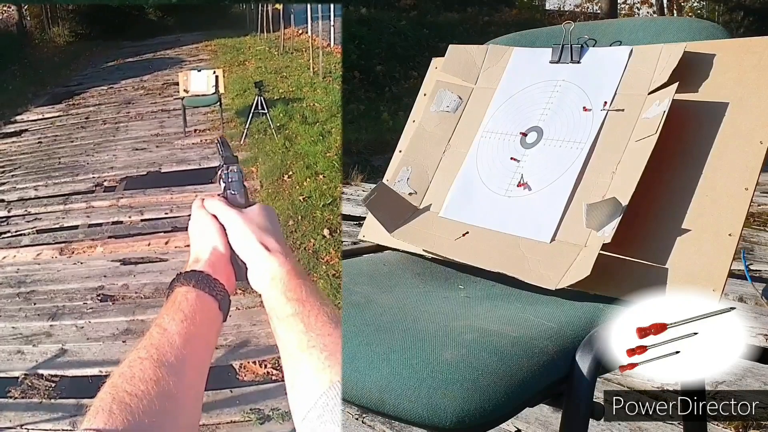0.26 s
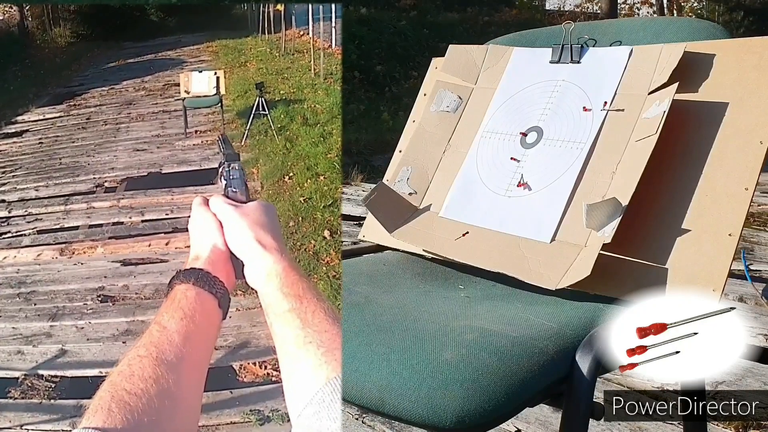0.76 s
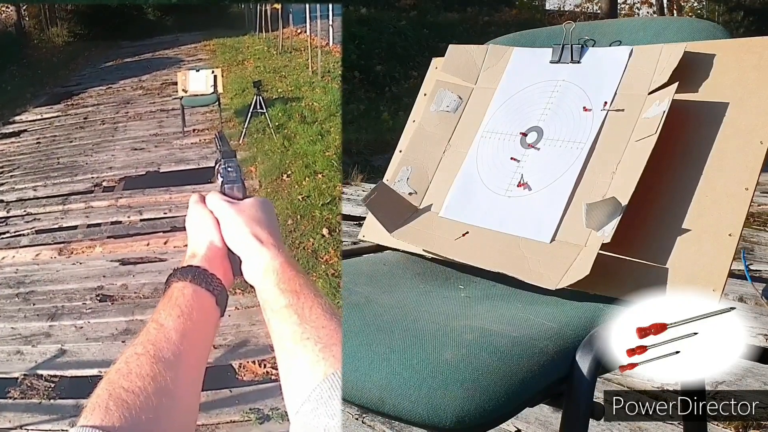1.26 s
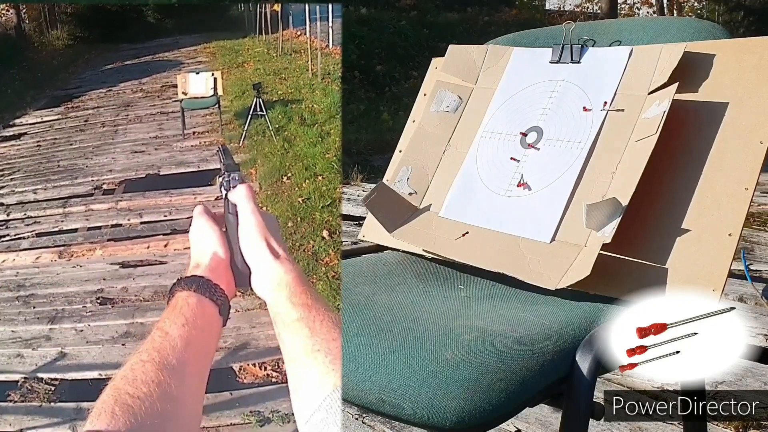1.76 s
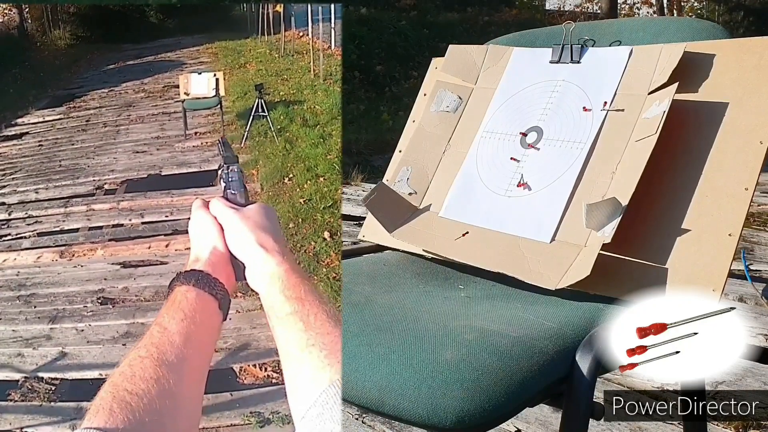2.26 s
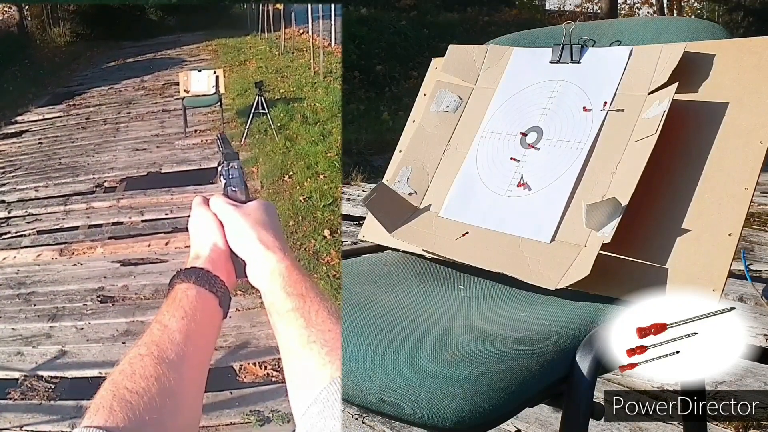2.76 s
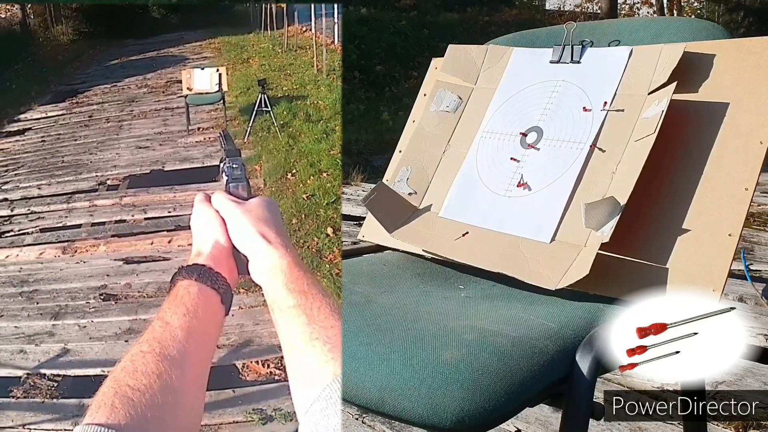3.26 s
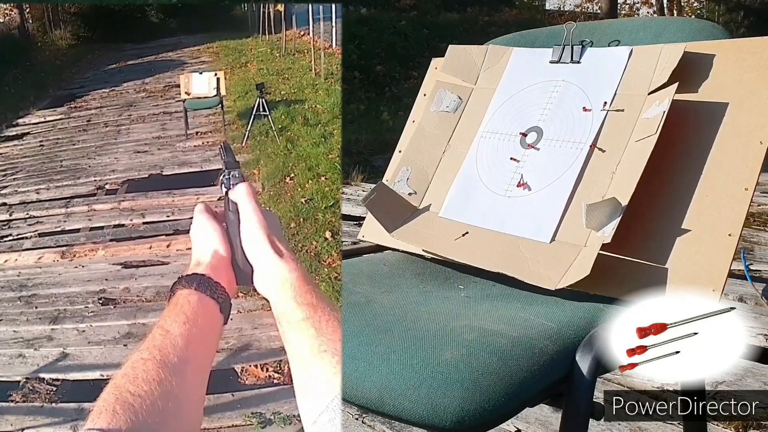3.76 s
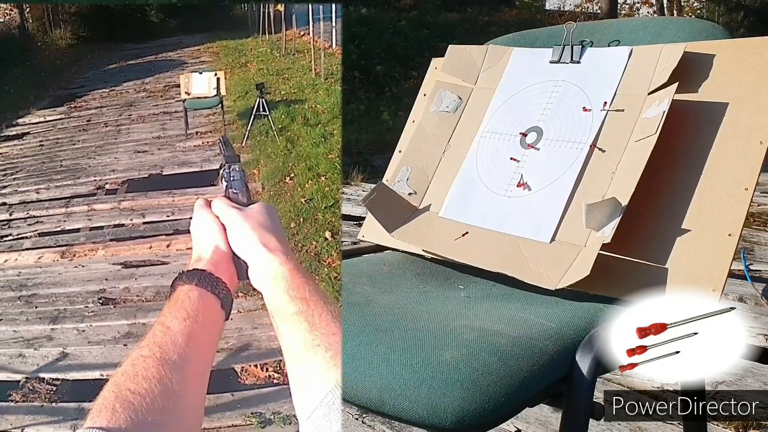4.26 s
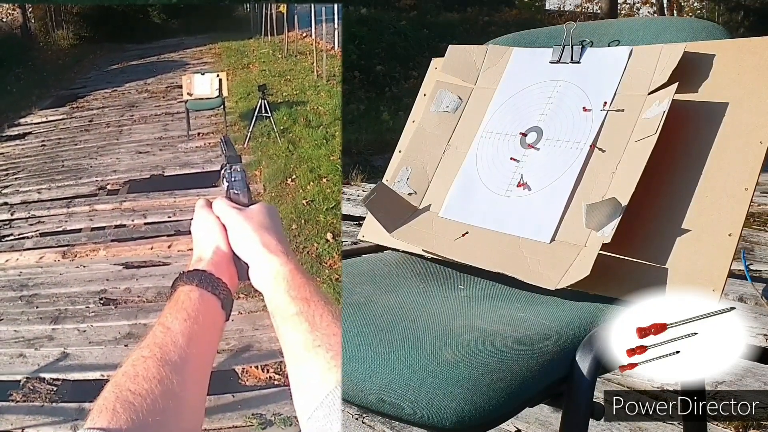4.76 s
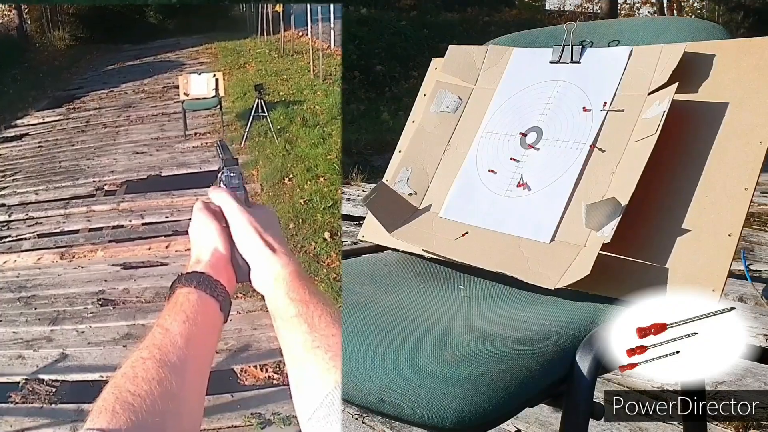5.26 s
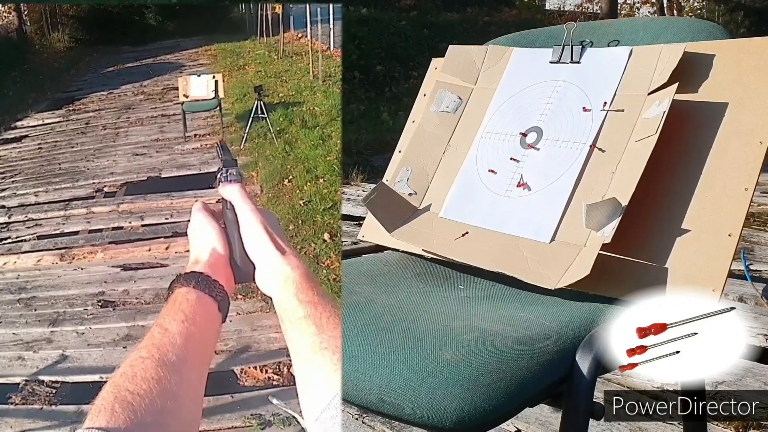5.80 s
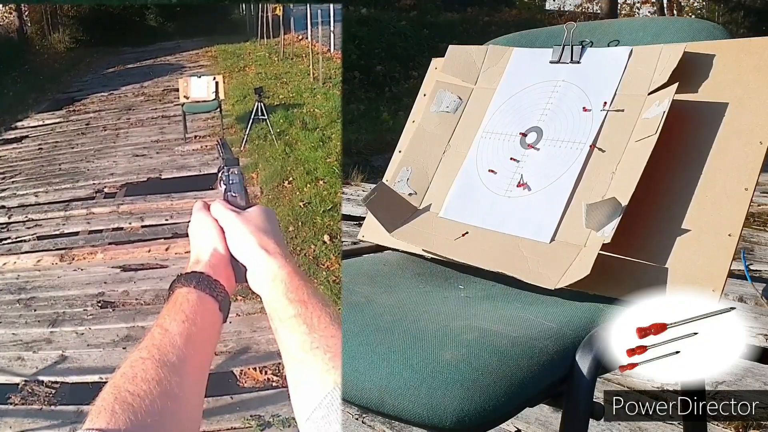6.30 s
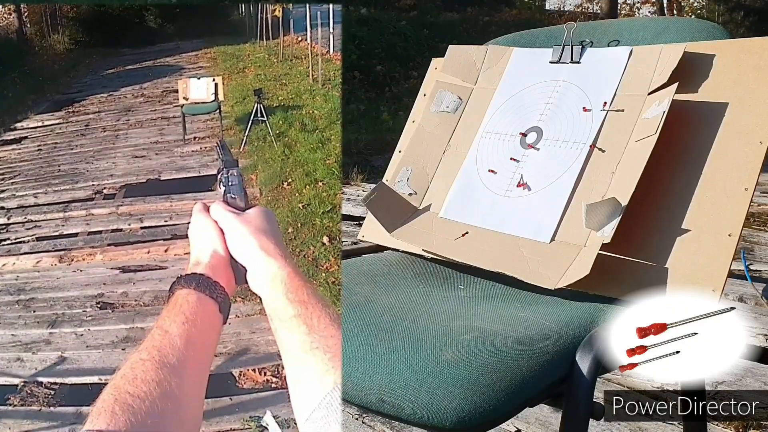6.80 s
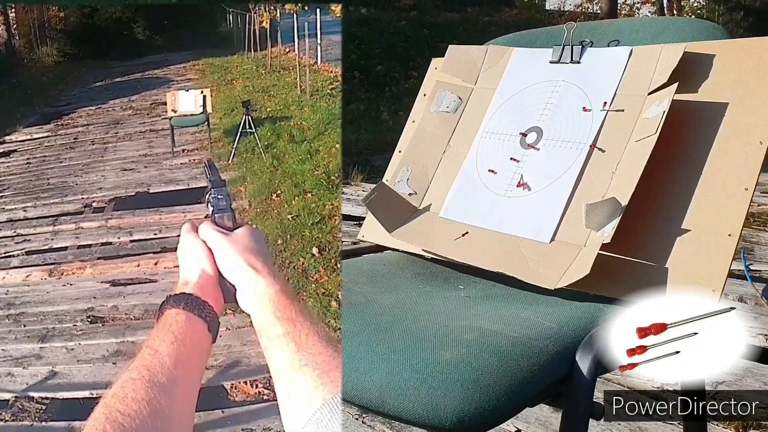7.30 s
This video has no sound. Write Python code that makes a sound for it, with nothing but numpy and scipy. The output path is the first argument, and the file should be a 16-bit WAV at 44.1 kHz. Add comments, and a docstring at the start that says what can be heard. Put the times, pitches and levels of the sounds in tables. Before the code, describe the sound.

A quiet garden murmur with light low wind. At 0.06 s a faint cylinder scrape and soft metal latch click; around 0.7 s barely audible bird chirps. At 1.22 s an air revolver fires: hammer snap, dry muzzle crack and short gas pop, overloading slightly, then a dart bursts sharply into cardboard at 1.31 s. Bright, uneven echoes fade within about half a second. Cocking clicks at 1.8 s, a shot at 3.22 s with card snap at 3.30 s, another tiny chirp and cocking near 3.8 s. From about 4.2 s a long gust rumbles and flutters deeply. The third shot, at 5.07 s, has a weaker crack but strong pop, its dart landing at 5.15 s; cocking at 5.7 s amid buffets. The final shot at 7.16 s is duller in its echo, followed by small knocks but no dart strike. Chest microphone and target stereo pair are blended.

```python
"""An air revolver fires at a cardboard target in a breezy garden: released gas pops as damped pressure cycles,
hammer and muzzle crack as decaying modes with hiss, and the darts burst the card and ring its box.
Cocking clicks and scrapes come before each shot; echoes, garden murmur and low wind are filtered noise,
far birds are gliding whistles. An overloading mono chest microphone and a stereo pair at the target are mixed."""
import sys
import numpy as np
from scipy import signal
from scipy.io import wavfile
from scipy.ndimage import uniform_filter1d

SR = 44100
rng = np.random.default_rng(int(sys.argv[2]) if len(sys.argv) > 2 else 0)


def file_out(sig):
    """Save sig as 16-bit WAV at sys.argv[1]."""
    # one column per channel
    cols = np.atleast_2d(sig).T
    # limit, then scale
    lim = np.clip(cols, -1, 1)
    pcm = np.round(lim * 32767).astype(np.int16)
    wavfile.write(sys.argv[1], SR, pcm)


N = 332499


def from_db(db):
    """Level to amplitude: 20 dB is a factor of ten in pressure."""
    return 10 ** (np.asarray(db) / 20)


def rms_one(x):
    """Normalisation to unit effective value."""
    return x / np.sqrt(np.mean(x ** 2) + 1e-20)


def at_hz(points, hz, order=1):
    """Spectral interpolation of one table column along a logarithmic pitch axis."""
    points = np.array(points)
    return np.interp(np.log(hz), np.log(points[:, 0]), points[:, order])


def clicks(times, db):
    """Impulse excitation: single samples at the given times."""
    out = np.full(N, 1e-18)
    out[np.round(np.asarray(times) * SR).astype(int)] = from_db(db)
    return out


def fade(x, t60):
    """Exponential decay: each click becomes a step that loses 60 dB in t60 seconds."""
    return signal.lfilter([1], [1, -from_db(-60 / (max(t60, .001) * SR))], x)


def puff(hz, cycles):
    """Pressure pulse: a few cycles that swell and sink."""
    turn = np.arange(0, cycles, hz / SR)
    return np.sin(2 * np.pi * turn) * np.sin(np.pi * turn / cycles) ** 0.36


def puffs(times, db, hz, cycles):
    """Superposition: the same pressure pulse placed at each given time."""
    return np.convolve(clicks(times, db), puff(hz, cycles))[:N]


def drift(rate_hz):
    """Random modulation: noise of spread 1 through two equal low-pass poles at rate_hz."""
    r = np.exp(-80 * np.pi * rate_hz / SR)   # one step is 40 samples
    slow = signal.lfilter([1], [1, -2 * r, r * r], rng.standard_normal(N // 40 + 2002))[2000:]
    return np.interp(np.arange(N) / 40, np.arange(len(slow)), rms_one(slow))


def strike(times, db, modes, spread_db=3.5, detune=0.032):
    """Modal excitation: each blow varies mode strength and pitch; neighbouring modes start opposed."""
    hz, level_db, t60 = np.transpose(modes)[:, :, None]
    after = np.arange(SR // 5) / SR
    out = np.zeros(N + SR)
    sign = (-1.) ** np.arange(len(modes))[:, None]
    chance = rng.standard_normal((len(times), 2, len(modes), 1))
    for s, blow_db, (strong, sharp) in zip(times, db, chance):
        envelope = from_db(blow_db + level_db + spread_db * strong - 60 * after / t60)
        rings = envelope * np.sin(2 * np.pi * hz * (1 + detune * sharp) * after)
        start = round(s * SR)
        out[start:start + len(after)] += (sign * rings).sum(axis=0)
    return out[:N]


def crack(times, db, modes, fizz_db, fizz_t60, lag_s):
    """Impact with arrival delay: modes and a burst of hiss reach the right capsule later."""
    ring = strike(times, db, modes, spread_db=0.5)
    fizz = from_db(fizz_db) * fade(clicks(times, db), fizz_t60) * rng.standard_normal((2, N))
    left, right = ring + fizz
    return np.array([left, np.roll(right, round(lag_s * SR))])


# shots, relative levels: start_s (hammer fall), hammer_db, crack_db, pop_db, echo_db,
# echo_tilt (dB per octave above 1 kHz), hiss_db, late_echo_db (against the early echo)
SHOTS = [(1.2222, -4, -7, -11, -20.5, -0.3, -27.5, -12), (3.2188, 0, -1, -14, -20, -1.24, -28, -13),
         (5.0670, -3.5, -21.5, -8.5, -20.5, -1.76, -27.5, -9.5),
         (7.1566, -2.5, -7, -9.5, -18.5, -4, -31.5, -12)]
# the pop and its returns from arms, deck and fence: delay_s (after the pop), level_db, pitch_hz, length (cycles)
RETURNS = [(0, 9.5, 701, 1.3), (.0086, -2, 640, 2.0), (.0145, 3, 770, 2.6), (0.0235, -6.5, 597, 1.5),
           (0.0275, -5, 904, 3.0), (.031, -12, 770, 3.5)]
POP_S = .0105   # from hammer fall to pop at the chest


def pop():
    """Gas discharge and reflection: it first sucks, then throbs over a slow push; returns follow."""
    shots = np.array(SHOTS)
    s, db = shots[:, 0] + POP_S, shots[:, 3]
    out = puffs(s + 0.0013, db + 2, 170, .72)   # slow push of air
    out -= puffs(s + 0.0065, db - 15.5, 190, 2.4)   # a weaker low throb follows
    for later_s, level_db, hz, cycles in RETURNS:
        chance_db = 1.1 * rng.standard_normal(len(s))
        out -= puffs(s + later_s, db + level_db + chance_db, hz, cycles)
    return out


# modes of the muzzle crack: pitch_hz, level_db (relative), t60_s
MUZZLE = [(920, -5.5, 0.005), (2245, -4, 0.0022), (5500, 1, .004), (7270, -6, 0.0037), (14100, -6, .004)]
CRACK_S, LAG_S = .0143, .00045   # hammer fall to crack at the target; right capsule later


def muzzle_crack():
    """Impulsive radiation: the shot excites short modes and a burst of hiss."""
    shots = np.array(SHOTS)
    return crack(shots[:, 0] + CRACK_S, shots[:, 2], MUZZLE, fizz_db=-6, fizz_t60=.01, lag_s=LAG_S)


# modes of the hammer: pitch_hz, level_db (relative), t60_s
HAMMER = [(1050, -0.5, 0.007), (3016, 1.5, 0.0018), (1715, -16.5, 0.0012), (5070, -10.5, 0.0033),
          (6900, -10.5, 0.0074), (13900, -18, 0.0097)]


def hammer():
    """Modal impact: the falling hammer sets its modes ringing."""
    shots = np.array(SHOTS)
    return crack(shots[:, 0], shots[:, 1], HAMMER, fizz_db=-11, fizz_t60=0.01, lag_s=LAG_S)


def hiss():
    """Decaying broadband noise: bright hiss after each shot is faded to silence within 0.18 s."""
    shots = np.array(SHOTS)
    decay = fade(clicks(shots[:, 0], shots[:, 6]), 0.61)
    fade_out = np.hanning(round(.36 * SR))[round(.18 * SR):] ** .5
    window = np.convolve(clicks(shots[:, 0], 0), fade_out)[:N]
    high_pass = signal.butter(2, 4900, "high", fs=SR, output="sos")
    bright = signal.sosfilt(high_pass, rng.standard_normal((2, N)))
    return decay * window * bright


# darts in the cardboard, relative levels: start_s, snap_db, thud_db, tail_db,
# pitch (share of the snap modes), box_db (ring at the target)
STRIKES = [(1.3096, -1.5, -21, -20.5, 1.04, -28), (3.2968, -2.5, -21, -16.5, 0.98, -22),
           (5.1468, -0.5, -23, -23.5, 1.027, -31)]
# modes of the snapping card: pitch_hz (scaled by each dart's share), level_db (relative), t60_s
SNAP = [(2820, -14, 0.0035), (3670, -29, 0.0026), (6370, -7.5, 0.0047), (9400, -19, 0.0015),
        (11700, -15, 0.0024), (2440, -28, 0.0054)]


def punch(s, db, pitch):
    """Fracture transient: paper bursts under the point and card snaps, later at the right capsule."""
    lag_s = .00014 / pitch
    burst = -puffs([s], db + 4.5, 3390 * pitch, 2.75)
    modes = np.multiply(SNAP, [pitch, 1, 1])
    snap = crack([s], np.array([db]), modes, fizz_db=-23.0, fizz_t60=0.0065, lag_s=lag_s)
    return snap + [burst, np.roll(burst, round(lag_s * SR))]


# modes of the target box: pitch_hz, level_db (relative), t60_s
BOX = [(630, 3.5, 0.011), (248, 2, 0.014), (498, 2.5, 0.031), (409, -12.5, 0.21), (830, -12, 0.01),
       (1110, -4, 0.022), (1880, -10, 0.012), (726, -11, 0.045), (3400, -1, 0.0067)]
THUD_S = .0365   # the strike reaches the chest later


def box_at_target():
    """Structural resonance: the struck box rings close to the stereo pair."""
    strikes = np.array(STRIKES)
    return strike(strikes[:, 0] + 0.00075, strikes[:, 5], BOX, spread_db=-1.5)


def box_at_chest():
    """Propagation delay and reflection: the thud arrives late and a wall returns it once."""
    strikes = np.array(STRIKES)
    s, db = strikes[:, 0] + THUD_S, strikes[:, 2]
    return strike(np.r_[s, s + .0705], np.r_[db, db - 19.5], BOX, spread_db=2.9)


# cocking, relative levels: start_s (latch), latch_db, scrape_db, pawl_db
COCKING = [(0.0588, -38.5, -47.5, -69), (1.809, -37.5, -47.5, -69.5), (3.821, -35.5, -46.5, -70),
           (5.691, -33, -48, -73.5)]
# modes of the latch: pitch_hz, level_db (relative), t60_s
LATCH = [(935, 3.5, 0.021), (750, -9, 0.0076), (1400, -1.5, 0.0031), (1730, -4.5, 0.032),
         (2210, -6, 0.0082), (3540, -5, 0.0085)]
# modes of the cylinder teeth: pitch_hz, level_db (relative), t60_s
RATCHET = [(2380, -2.5, 0.012), (4640, -9, 0.011), (6520, 2, 0.0055), (12800, 0, 0.007)]
SCRAPE_S, PAWL_S = .036, .011   # before the latch


def cocking():
    """Ratchet impacts: teeth tick as the cylinder turns, the pawl clicks, the hammer latches softly."""
    s, latch_db, scrape_db, pawl_db = np.transpose(COCKING)
    pawl = fade(clicks(s - PAWL_S, pawl_db), .015) * np.diff(rng.standard_normal(N + 1))
    pawl += strike(s - PAWL_S, pawl_db + 23.5, RATCHET)
    teeth_s = s[:, None] - SCRAPE_S * rng.uniform(.2, .95, (len(s), 8))
    ticks = strike(teeth_s.ravel(), np.repeat(scrape_db, repeats=8) - 7, RATCHET, spread_db=5)
    # the latch touches twice; the cylinder stop drops in before it
    touch_s = np.r_[s, s + .0026, s - .019]
    touch_db = np.r_[latch_db, latch_db - 4, latch_db - 13]
    latch = strike(touch_s, touch_db, LATCH, spread_db=2.5, detune=.05)
    latch = np.convolve(latch, np.hanning(12) / 5.5)[:N]   # soft contact
    return latch + pawl + ticks


def scrape_strength():
    """Friction: the turning cylinder scrapes with rapidly wavering strength."""
    moves = np.array(COCKING)
    starts = clicks(moves[:, 0] - SCRAPE_S, moves[:, 2])
    turning = np.convolve(starts, np.linspace(.5, 1, round(SCRAPE_S * SR)))[:N]
    return .006 * fade(turning, .03) * from_db(3 * drift(150))


# small knocks, and faint echoes of the dart strikes: start_s, level_db (relative), pitch_hz (nominal)
KNOCKS = [(0.18, -54, 960), (1.41, -41.5, 2660), (1.459, -49, 1640), (1.949, -56, 845), (3.396, -42, 2520),
          (3.413, -48, 2400), (3.493, -52, 2980), (3.662, -51, 1030), (3.968, -50.5, 960),
          (5.246, -40, 2600), (5.261, -44, 2300), (5.827, -47.5, 1040), (7.202, -27, 1600),
          (7.232, -35, 2070), (7.265, -37, 1314), (7.295, -39.5, 920), (7.394, -43.5, 1700),
          (7.412, -48, 1970), (7.497, -53, 1630), (7.403, -50, 7000)]


def knocks():
    """Short tone pulses: each has a few cycles, with a duller and a brighter companion."""
    out = np.zeros(N)
    for s, db, hz in KNOCKS:
        for share, level_db in [(0.968, 4.0), (0.77, -25.0), (1.5, -5)]:
            out += puffs([s], db + level_db, hz * share, 5)
    return out


def slaps():
    """Discrete reflection: posts and planks return the crack as small slaps, each from its own side."""
    shots = np.array(SHOTS)
    later_s = rng.uniform(.03, 0.22, (len(shots), 20))
    chance = rng.standard_normal((len(shots), 20))
    db = shots[:, 4:5] - 5.5 - 60 * later_s / 0.55 + 4 * chance   # t60 0.55 s
    s = shots[:, :1] + CRACK_S + later_s
    return np.array([strike(s[:, k::2].ravel(), db[:, k::2].ravel(), MUZZLE, spread_db=5, detune=.1)
                     for k in range(2)])


# echo tail: pitch_hz, shot_db (relative, per Hz), strike_db (relative, per Hz), early_t60_s, late_t60_s
TAIL = [(101, 11.5, -20, 0.11, 0.055), (310, 7, 10, 0.0098, 0.34), (800, 5.5, -7.5, 0.11, 0.57),
        (2090, 1, -24, 0.17, 0.58), (3150, 0.5, -5, 0.14, 0.5), (5400, -1, -12.5, 0.095, 0.4),
        (10000, -17.5, -15.5, 0.14, 0.33), (15400, -8.5, -13.5, 0.15, 0.12)]


def echo_tail(hz):
    """Reverberant decay: in each band, echoes from fences and trees die at an early and a late rate."""
    shots, strikes = np.array(SHOTS), np.array(STRIKES)
    # each late level holds until the next shot
    spans = np.diff(np.r_[0, np.round(shots[1:, 0] * SR), N]).astype(int)
    late = from_db(np.repeat(shots[:, 7], spans))
    colour_db = 1.5 * rng.standard_normal(len(shots))   # differs from shot to shot
    echo_db = shots[:, 4] + shots[:, 5] * max(np.log2(hz / 1000), 0) + colour_db
    blasts = clicks(shots[:, 0], echo_db - 0.5) + clicks(shots[:, 0] + CRACK_S, echo_db)
    landings = clicks(strikes[:, 0], strikes[:, 3])
    sent = from_db(at_hz(TAIL, hz)) * blasts + from_db(at_hz(TAIL, hz, order=2)) * landings
    tail = fade(sent, at_hz(TAIL, hz, order=3)) + fade(late * sent, at_hz(TAIL, hz, order=4))
    if hz > 1200:   # bright echoes take a moment to build up
        tail -= fade((1 + late) * sent, .02)
    return tail


def near_echo():
    """Scattering: dull returns at the chest decay after each pop and each thud."""
    shots, strikes = np.array(SHOTS), np.array(STRIKES)
    pops = clicks(shots[:, 0] + POP_S + .017, shots[:, 3] - 4.0)   # after the first returns
    thuds = clicks(strikes[:, 0] + THUD_S, strikes[:, 2] + 3)
    return from_db(-20) * fade(pops + thuds, 0.14)


# far birds: start_s, length_s, start_hz, end_hz, level_db (before the blur)
CHIRPS = [(0.688, 0.058, 5540, 6200, -69), (0.761, 0.0027, 4870, 3750, -48.5),
          (3.738, 0.053, 6030, 5700, -66.5)]


def birds():
    """Frequency glide: short whistles, their amplitude blurred by distance."""
    blur = drift(140)
    out = np.zeros(N)
    for s, length_s, start_hz, end_hz, db in CHIRPS:
        size, start = round(length_s * SR), round(s * SR)
        glide = np.sin(2 * np.pi * np.cumsum(np.linspace(start_hz, end_hz, size)) / SR)
        out[start:start + size] = from_db(db + 3.7 * blur[:size]) * glide * np.hanning(size)
    return out


# stereo likeness of diffuse noise: pitch_hz, left-right likeness (-1..1)
LIKENESS = [(130, 0.94), (290, 0.96), (640, 0.39), (1400, 0.068), (3000, 0.077), (15000, -0.19)]


def bands():
    """Partial coherence: half-octave noise bands, flat per Hz, mix a common and an opposed part."""
    edges = 90 * 2 ** np.arange(0, 7.6, .5)
    white = rng.standard_normal((2, 2, N))   # alternate bands take alternate noise
    for k, (low, high) in enumerate(zip(edges, edges[1:])):
        sos = signal.butter(2, [low, high], "band", fs=SR, output="sos")
        mid, side = signal.sosfilt(sos, white[k % 2])
        hz = np.sqrt(low * high)
        alike = np.clip(at_hz(LIKENESS, hz), -1, 1)
        yield hz, np.sqrt(1 + alike) * mid + np.sqrt(1 - alike) * side * [[1], [-1]]


# spectrum of the garden murmur: pitch_hz, level_db (relative, per Hz)
GARDEN = [(59, -27), (100, -8), (167, -13.5), (240, -6.5), (273, -7), (615, -7.5), (684, 0), (942, -8),
          (1990, -16), (4200, -21), (6600, -23), (8690, -36.5), (14800, -28.5), (16500, -50)]
# spectrum of the cylinder scrape: pitch_hz, level_db (relative, per Hz)
SCRAPE = [(290, -36), (500, -16), (933, 4), (1140, -8), (1720, 6.5), (3920, -4.5), (10400, -13.5),
          (12900, -5), (16000, -17)]
# dull scatter at the chest: pitch_hz, level_db (relative, per Hz)
NEAR_ECHO = [(300, -6.5), (550, -6), (1000, 5), (2200, -7), (3500, -28)]


def surroundings():
    """Band synthesis: the same noise bands carry garden murmur, echoes and the cylinder scrape."""
    near, turning = near_echo(), scrape_strength()
    lumps_db = 2.5 * drift(72)   # echoes return unevenly
    leaves_db = 0.5 * drift(0.82)   # above 3 kHz the murmur swells slowly with the leaves
    murmur, other = 0, 0
    for hz, band in bands():
        murmur_db = at_hz(GARDEN, hz) + 0.67 * drift(6.8) + leaves_db * (hz > 3000)
        murmur = murmur + band * from_db(murmur_db)
        tail = echo_tail(hz)
        lumps = from_db(lumps_db + 2 * drift(30))
        other = other + band * (tail * lumps + from_db(at_hz(SCRAPE, hz)) * turning)
        if 250 < hz < 4000:   # the scatter is mono
            other = other + band[0] * from_db(at_hz(NEAR_ECHO, hz)) * near * lumps
    return from_db(-59) * rms_one(murmur) + other


def buffeting(low_hz, high_hz, lumpy_db, order=2):
    """Turbulent pressure on a port: lumpy low noise, levelled so that a later curve sets its strength."""
    sos = signal.butter(order, [low_hz, high_hz], "band", fs=SR, output="sos")
    noise = signal.sosfilt(sos, rng.standard_normal(N))
    noise /= np.sqrt(uniform_filter1d(noise ** 2, size=4000))
    return rms_one(noise * from_db(lumpy_db * drift(28)))


# low rumble at the chest, light wind with the low push of shots, then a long gust:
# start_s, level_db (before wavering)
CHEST_RUMBLE = [(0.0, -51.5), (0.73, -52), (1.05, -57), (1.26, -35), (1.49, -55), (1.55, -39), (1.68, -63),
                (1.78, -48.5), (3.09, -57), (3.23, -46), (3.4, -54), (3.74, -42), (4.05, -39), (4.43, -29),
                (4.79, -33), (5.25, -26.5), (5.35, -35.5), (5.48, -28), (5.59, -35), (5.65, -30.5),
                (5.78, -40.5), (5.8, -35.5), (5.9, -29), (5.96, -35), (6.07, -26.5), (6.15, -34.5),
                (6.19, -26.5), (6.26, -34), (6.53, -32), (6.74, -42), (6.87, -28), (7.12, -44.5),
                (7.18, -30.5), (7.39, -43.5), (7.48, -36), (7.54, -40)]
# faster flutter on the chest: start_s, level_db (before wavering)
FLUTTER = [(0, -63.5), (1.1, -61.5), (1.5, -55), (1.7, -66), (2.15, -60.5), (2.9, -64), (3.6, -60),
           (4.1, -57), (4.22, -41), (4.3, -46), (4.39, -33), (4.5, -53), (4.78, -53), (4.88, -34),
           (5.03, -37), (5.3, -42.5), (5.55, -59), (5.62, -40.5), (5.78, -52), (5.9, -37), (6.0, -41),
           (6.15, -53.5), (6.28, -42), (6.4, -47.5), (6.5, -39.5), (6.58, -55), (6.74, -53), (6.86, -46),
           (6.95, -50), (7.08, -56), (7.4, -53.5), (7.5, -49)]
# low wind noise that differs between left and right: start_s, level_db (before wavering)
SIDE_WIND = [(0, -58), (.45, -49.5), (.95, -51), (1.27, -30.5), (1.45, -43), (1.58, -44), (1.95, -51.5),
             (2.3, -71), (2.9, -64), (3.002, -48), (3.2, -42), (3.399, -57), (4.701, -50.5), (4.9, -91),
             (6.349, -86), (6.8, -46), (7.302, -53), (7.5, -36)]
# single buffets: start_s, level_db (before the port filter), pitch_hz, length (cycles), right against left (-1..1)
BUFFETS = [(1.277, -12, 93, 2.05, -0.26), (1.549, -18.5, 80.7, 2.2, -0.39), (4.378, -23.5, 80.3, 1.34, 1),
           (5.16, -12.5, 31.4, 0.22, 1), (5.7, -27, 91, 1.05, 1), (5.885, -22, 79, 2.3, 1),
           (6.025, -23, 37.8, 2.2, 1), (6.181, -22.5, 43, 1.62, 1), (6.27, -20.5, 98, 0.94, 1),
           (6.372, -25.5, 62.6, 1.24, 1), (6.489, -18, 64, 1.13, 0.97)]
EDDY_DB, EDDY_HZ = 1.94, 2   # passing eddies make the strength waver
PORT_HZ = 312   # wind pressure on the ports holds little above this


def wind():
    """Turbulent port pressure: low noise follows level curves, partly shared and partly per channel."""
    t = np.arange(N) / SR
    side_db = np.interp(t, *np.transpose(SIDE_WIND)) + EDDY_DB * drift(EDDY_HZ)
    waver_db = EDDY_DB * drift(EDDY_HZ) + 1.77 * drift(3.4)   # shakes rumble and flutter together
    rumble = from_db(np.interp(t, *np.transpose(CHEST_RUMBLE))) * buffeting(10.5, 39, lumpy_db=0.5)
    flutter = from_db(np.interp(t, *np.transpose(FLUTTER))) * buffeting(38, 165, lumpy_db=6.0, order=3)
    sides = np.array([buffeting(33, 56, lumpy_db=-1.5), buffeting(35, 83, lumpy_db=3.0)])
    out = from_db(waver_db) * (rumble + flutter)
    out = out + from_db(side_db) * sides * from_db([[1.5], [-1.5]])   # left raised, right lowered
    for s, db, hz, cycles, right in BUFFETS:
        push = from_db(db) * puff(hz, cycles)
        start = round(s * SR)
        out[:, start:start + len(push)] += push * [[1], [np.clip(right, -1, 1)]]
    return signal.sosfilt(signal.butter(2, PORT_HZ, fs=SR, output="sos"), out)


def overload(x, top):
    """Saturation: a microphone bends smoothly towards its greatest amplitude."""
    return top * np.tanh(x / top)


def scene():
    """Superposition: each microphone overloads on its own, then both and the wind are summed."""
    chest = pop() + box_at_chest() + cocking() + knocks()
    target = hammer() + muzzle_crack()
    for s, snap_db, *_, pitch, box_db in STRIKES:
        target += punch(s, snap_db, pitch)
    target += box_at_target()
    target += slaps() + hiss() + surroundings() + birds()
    return overload(chest, .5) + overload(target, .9) + wind()


def record(dry):
    """Clipping and band limiting: the mix is bounded, then cut steeply towards 16.8 kHz."""
    low_pass = signal.cheby2(12, 70, 16800, fs=SR, output="sos")
    return signal.sosfilt(low_pass, np.clip(dry, -.9, .9))


dry = scene()
out = record(dry)
file_out(out)
```